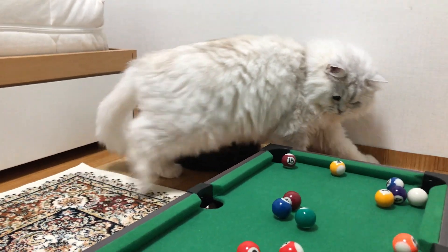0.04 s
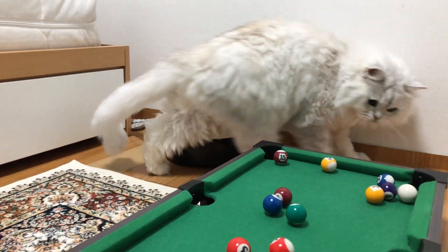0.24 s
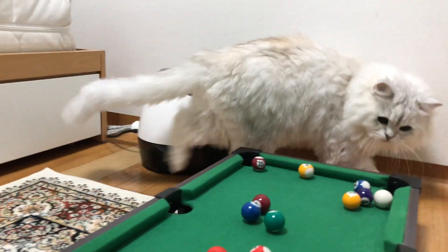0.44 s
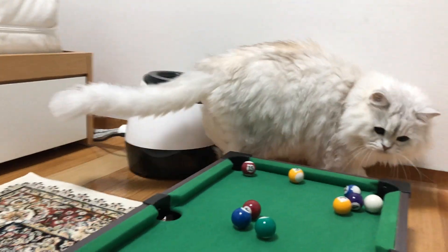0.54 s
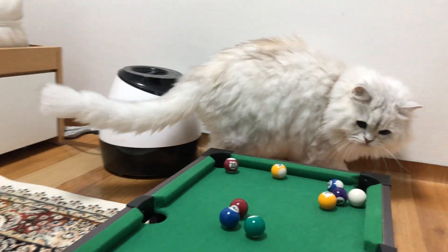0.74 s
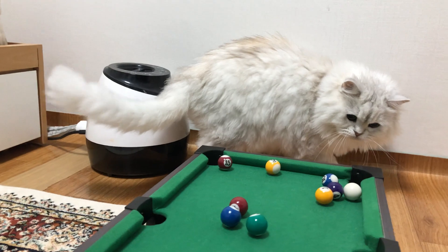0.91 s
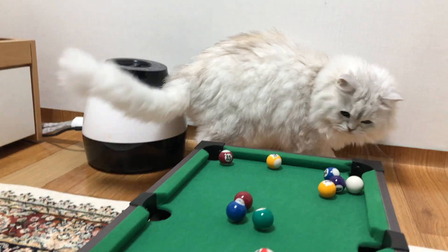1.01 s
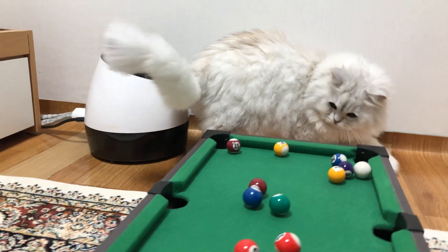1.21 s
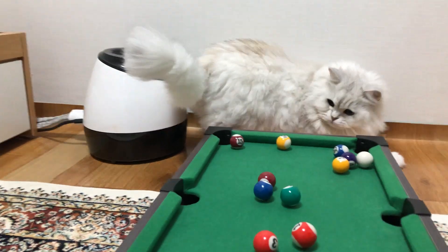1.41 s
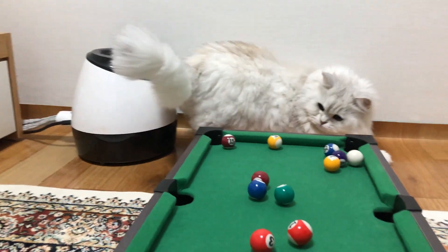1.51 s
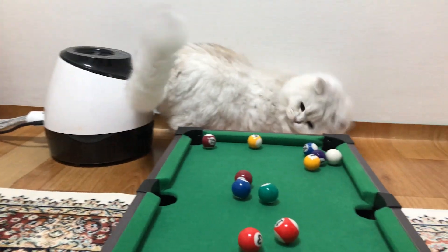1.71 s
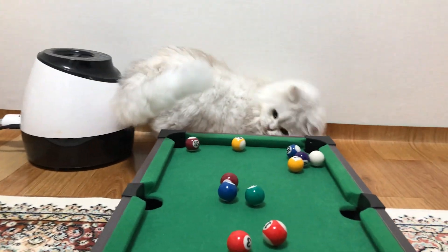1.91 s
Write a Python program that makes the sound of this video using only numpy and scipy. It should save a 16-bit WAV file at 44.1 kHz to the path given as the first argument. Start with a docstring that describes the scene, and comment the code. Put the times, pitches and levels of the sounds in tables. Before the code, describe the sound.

A small pool ball bounces with quick clacks on wood, followed by one duller knock.

```python
"""A ball on a small pool table

A hard ball clicks against a rim, drops onto bare wood and bounces to rest, ever faster. It rolls on
faintly and ends with a duller knock on the frame. Each hit makes the hollow table ring briefly, and a
quiet living room echoes it. Soft bumps and faint rustles, perhaps from a cat, lie underneath."""
import sys
import numpy as np
from scipy import signal
from scipy.fft import rfft, irfft
from scipy.io import wavfile

SR = 44100
rng = np.random.default_rng(int(sys.argv[2]) if len(sys.argv) > 2 else 0)


def transcribe(signal):
    """Save signal, clipped to [-1, 1], as a 16-bit WAV file at the path in sys.argv[1]."""
    frames = np.atleast_2d(signal).T
    limited = np.clip(frames, -1, 1)
    pcm = np.round(limited * 32767).astype(np.int16)
    wavfile.write(sys.argv[1], SR, pcm)


N = 85995
T = np.arange(N) / SR
RING_T = T[:SR * 6 // 10]   # each hit gets 0.6 s to ring
BAND_EDGES_HZ = 22 * 2 ** (np.arange(30) / 3)   # three bands to an octave
BAND_HZ = np.sqrt(BAND_EDGES_HZ[1:] * BAND_EDGES_HZ[:-1])


def from_db(db):
    """Turn decibels into a number to multiply by."""
    return 10 ** (np.asarray(db) / 20)


def at_hz(table, hz, column=1):
    """Read a table's column at any pitch, blending between its rows."""
    rows = np.array(table)
    return np.interp(np.log(hz), np.log(rows[:, 0]), rows[:, column])


def place(sound, start):
    """Start a sound at a given time in seconds."""
    return np.pad(sound, (int(start * SR), N))[:N]


def band_noise(low, high, size):
    """Noise of strength 1 between two frequencies."""
    band = signal.butter(2, [max(low, 10), high], "band", fs=SR, output="sos")
    noise = signal.sosfilt(band, rng.standard_normal(size + SR // 10))[-size:]
    return noise / noise.std()


def soften(sound, hz):
    """Turn down the treble above hz, as a longer, softer contact does."""
    return signal.sosfilt(signal.butter(2, min(hz, .45 * SR), fs=SR, output="sos"), sound + 1e-18)


def cut_bass(sound, hz):
    """Turn down the deep bass below hz."""
    return signal.sosfilt(signal.butter(2, hz, "high", fs=SR, output="sos"), sound)


def spread_time(hz):
    """Seconds a bending wave takes to spread over the board: low ones are slower."""
    return .003 * (300 / hz) ** 0.83


def die_away(t, fade):
    """A struck thing loses energy: it falls by 60 dB in its fade time."""
    return np.exp(-np.log(1000) * t / fade)


def tone(hz, db, fade, delay=0):
    """One pure tone that swells over its first half cycle and dies away."""
    t = np.maximum(RING_T - delay, 0)
    return from_db(db) * np.sin(2 * np.pi * hz * t) * die_away(t, fade) * np.minimum(2 * hz * t, 1)


def ring(tones):
    """One blow sets a body's own tones ringing; every second one swings the other way."""
    return sum((-1) ** k * tone(hz, db, fade, spread_time(hz)) for k, (hz, db, fade) in enumerate(tones))


def dense_ring(levels_db, fades, rises):
    """Countless tones blur into noise: each band swells and dies at its own rate."""
    out = 0
    for low, high, db, fade, rise in zip(BAND_EDGES_HZ, BAND_EDGES_HZ[1:], levels_db, fades, rises):
        swell = 1 - np.exp(-(RING_T / rise) ** 2)
        band = band_noise(low, high, len(RING_T)) * swell * die_away(RING_T, fade)
        energy_share = 2 * (high - low) / SR   # wider bands carry more
        out = out + band * from_db(db) * np.sqrt(energy_share / np.sum(band ** 2))
    return out


def wood_and_room(colour):
    """The board's short clatter, then the room's echo; colour sets how strong each pitch is."""
    # how long the room echoes: (pitch [Hz], fade time [s])
    room_fades = [(100, 0.18), (300, 0.36), (1500, 0.15), (4000, 0.23), (15000, .24)]
    wood_fades = 0.023 * (BAND_HZ / 1000) ** -0.5   # treble dies sooner
    spread = spread_time(BAND_HZ)
    wood = dense_ring(at_hz(colour, BAND_HZ), wood_fades, rises=1.3 * spread)
    room = dense_ring(at_hz(colour, BAND_HZ, column=2), at_hz(room_fades, BAND_HZ), rises=.0022 + spread)
    return wood + room


def at_spot(tones, spot):
    """Where a body is struck (spot 0 to 1) decides how strongly each tone rings."""
    return [(hz, np.interp(spot, [0, 1], [db_0, db_1]), fade) for hz, db_0, db_1, fade in tones]


def strike(hits, tones_at, colour):
    """Each hit has its own strength, hardness and weight; tones and clatter change with the spot."""
    clatter_0, clatter_1, out = wood_and_room(colour), wood_and_room(colour), 0
    bass_filter = signal.butter(1, 700, fs=SR)   # keeps what is below 700 Hz
    for start, db, treble_hz, bass_db, spot in hits:
        hit = tones_at(spot) + np.sqrt(1 - spot) * clatter_0 + np.sqrt(spot) * clatter_1
        bass_change = (from_db(bass_db) - 1) * signal.lfilter(*bass_filter, hit)
        out = out + place(from_db(db) * soften(hit + bass_change, treble_hz), start)
    return out


def taps(touches, tones):
    """Light touches that each ring a few tones."""
    return sum(place(from_db(db) * ring(tones), start) for start, db in touches)


def room_air():
    """The steady, low hush of air in a quiet room."""
    # colour of the hush: (pitch [Hz], relative level [dB])
    colour = [(25, -30.5), (55, -3), (170, -3.5), (300, -10.5), (1000, -20), (4000, -28), (16000, -35)]
    hz = np.maximum(np.arange(N // 2 + 1) * SR / N, 1)
    hush = irfft(rfft(rng.standard_normal(N)) * from_db(at_hz(colour, hz)), N)
    return from_db(-68) * hush / hush.std()


def rim_click():
    """The ball clips the rim: a light, bright tick with a little thump from the wood."""
    # colour of the thump: (pitch [Hz], wood level [dB], room level [dB])
    colour = [(101.5, -9.5, -15), (201, 7.5, 9.5), (330, 17, 12.5), (520, 9.5, 6), (744, -8, -4),
              (1450, -2.5, 1), (3450, -9.5, -18), (5100, -6.5, -3.5), (7400, -22.5, -25.5)]
    return place(tone(hz=5080, db=-22, fade=.013) + wood_and_room(colour), start=.1820)


def clack(spot):
    """The sharp sound where ball meets wood, with duller echoes from nearby boards."""
    # tones that start together: (pitch [Hz], level at spot 0 [dB], level at spot 1 [dB], fade time [s])
    tones = [(1785, -14.5, -12.5, 0.014), (2080, -22.5, -19, 0.027), (2805, -20, -20.5, 0.031),
             (3215, -9.5, -13, .012), (3625, -11.5, -18.5, .014), (4150, -32.5, -22, 0.027),
             (5480, -20, -17, .012), (5950, -24.5, -17, .011), (7110, -20.5, -28, .01),
             (8740, -28.5, -34.5, .014), (14800, -15.5, -17, .003)]
    # echoes from the boards: (delay [s], level [dB])
    echoes = [(.0028, -10), (.0055, -10), (.0083, -7)]
    direct = sum(tone(hz, db, fade) for hz, db, fade in at_spot(tones, spot))
    dull = soften(direct, hz=1900)
    return direct + sum(from_db(db) * np.interp(RING_T - lag, RING_T, dull, left=0) for lag, db in echoes)


def bounces():
    """The ball bounces to rest on bare wood, and the hollow table rings."""
    # hard hits: (time [s], level [dB], treble limit [Hz], bass change [dB], spot [0 lands, 1 settles])
    hits = [(.2329, 0.5, 14200, 0.5, 0), (.2657, -21.5, 12400, 13, 0.025), (.2843, -9.5, 1930, -17.5, 0.69),
            (.3482, -5, 12060, 1.5, 0.87), (.4142, -10.5, 12050, 1, 0.89),
            (.4540, -14.5, 10500, -3.5, 0.75), (.4767, -21, 7900, -2.5, 0.71), (.4915, -27, 4500, -1.5, 1),
            (.5020, -23, 4100, -31, 0.86), (.5105, -30.5, 1900, 4.5, 1)]
    # tones of the hollow table: (pitch [Hz], level [dB], fade time [s])
    table_tones = [(158, -32, .28), (196, -26, .2), (226, -31, .19), (295.5, -22, .16), (330.5, -23, .17),
                   (425, -29, .11), (573, -29, .12), (947, -28, .15), (1110, -29, .16), (1226, -30, .15),
                   (1344, -28, .15), (1600, -29, .15), (1812, -26.5, .17), (2015, -32, .16)]
    # short, hollow tones of the playing board: (pitch [Hz], level [dB], fade time [s])
    board_tones = [(364.1, -15, 0.051), (577.6, -12.5, .055)]
    # colour of the clatter: (pitch [Hz], wood level [dB], room level [dB])
    colour = [(60, 3, 4.5), (170, 17, 7.5), (340, 18, 15), (537, 19, 21.5), (750, 9, 12),
              (1040, 18.5, 19.5), (1700, 20, 16.5), (2450, 7, 1.5), (3882, 9, 4.5), (9600, -10, -10.5),
              (14100, -7, -9)]
    body = ring(table_tones) + ring(board_tones)
    return strike(hits, lambda spot: clack(spot) + body, colour)


def rolling():
    """The rolling ball makes a faint rumble and a thin whirr."""
    # stretches of rolling: (start [s], end [s], rumble level [dB], whirr level [dB])
    rolls = [(0.484, 0.577, -42, -57), (0.551, 0.675, -62.5, -68), (0.614, 0.814, -78, -76),
             (0.986, 1.142, -68, -99)]
    rumble = band_noise(low=133.5, high=168.5, size=N)
    whirr = band_noise(low=1918, high=2208, size=N)
    ramp_s, out = 0.06, 0
    for start, end, rumble_db, whirr_db in rolls:
        swell = np.clip(np.minimum(T - start, end - T) / ramp_s, 0, 1)
        out = out + swell * (from_db(rumble_db) * rumble + from_db(whirr_db) * whirr)
    return out


def knocks():
    """The rolling ball knocks dully on the hollow frame: one clear knock between two faint ones."""
    # knocks: (time [s], level [dB], treble limit [Hz], bass change [dB], spot along the frame [0 to 1])
    hits = [(.6335, -20.5, 965, -14, 0), (1.2178, 4.5, 11900, -0.5, 0), (1.3250, -17, 750, 7, 0.96)]
    # tones of the frame: (pitch [Hz], level at spot 0 [dB], level at spot 1 [dB], fade time [s])
    frame_tones = [(162, -46.5, -41, 0.39), (293, -39.5, -40, 0.18), (335.2, -56, -44.5, 0.3),
                   (486, -50, -36.5, 0.2), (813, -36, -35, 0.066), (846, -50.5, -42.5, 0.23),
                   (1140, -23, -41, 0.0015), (1558, -28, -27, 0.017)]
    # colour of the clatter: (pitch [Hz], wood level [dB], room level [dB])
    colour = [(99, -32, -14), (196, -48, -7), (528, 10, 0), (850, -14, -1), (1567, -1.5, -6.5),
              (2303, -27, -21.5), (3845, -45, -28.5), (5960, -51, -57)]
    return strike(hits, lambda spot: ring(at_spot(frame_tones, spot)), colour)


def bumps():
    """Soft, low bumps, perhaps of paws."""
    # soft touches: (time [s], level [dB])
    touches = [(.7765, -50.5), (.998, -63)]
    # the low tones they ring: (pitch [Hz], level [dB], fade time [s])
    tones = [(277.5, 3, 0.1), (348, -5.5, 0.11), (466, -11.5, 0.065)]
    return taps(touches, tones)


def ticks():
    """Crisp little ticks that go with the clear knock."""
    # tiny touches: (time [s], level [dB])
    touches = [(1.2187, -70), (1.2263, -52)]
    # the high tones they ring: (pitch [Hz], level [dB], fade time [s])
    tones = [(3940, -4, 0.045), (5700, 0, 0.0032), (9500, -9, 0.0071)]
    return taps(touches, tones)


def rustles():
    """Probably a cat brushing the furniture: swells of high hiss, one narrow enough to squeak."""
    # brushes: (middle time [s], length [s], pitch [Hz], level [dB], top of the band over pitch [ratio])
    brushes = [(1.40, 0.22, 3700, -78.5, 1.2), (1.499, 0.075, 3480, -80.5, 0.99),
               (1.912, 0.22, 3648, -77.5, 1.6)]
    out = 0
    for middle, length, hz, db, width in brushes:
        width = max(width, 1.01)
        swell = np.exp(-(2 * (T - middle) / length) ** 2)
        out = out + from_db(db) * swell * band_noise(hz / width, hz * width, N)
    return out


def scene():
    """Add the ball, the table and the quiet room together in one channel."""
    hits = rim_click() + bounces() + knocks() + bumps() + ticks()
    return (cut_bass(hits, hz=95) + rolling() + rustles() + room_air())[None]


def record(dry):
    """Cut off the very highest treble steeply."""
    cutoff_hz = 16300
    return signal.sosfilt(signal.ellip(10, .2, 80, cutoff_hz, fs=SR, output="sos"), dry)


dry = scene()
out = record(dry)
transcribe(out)
```